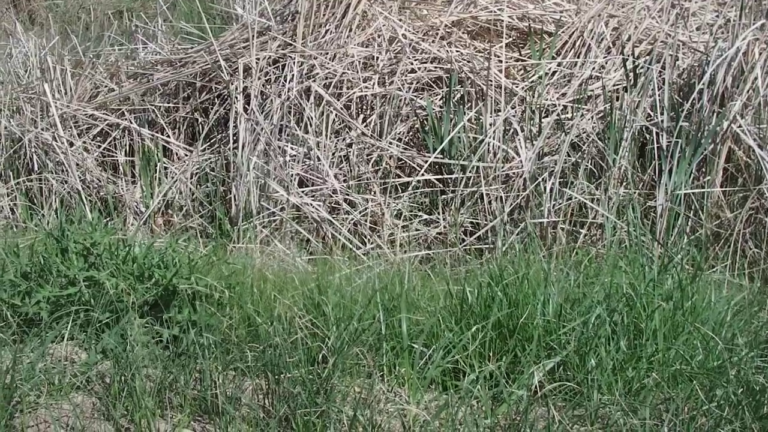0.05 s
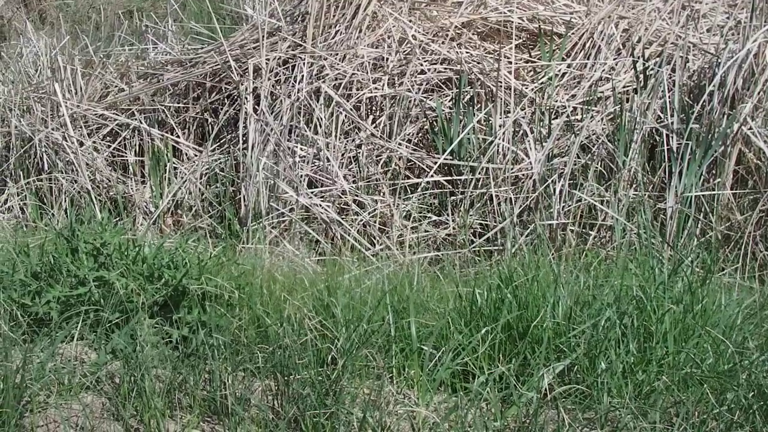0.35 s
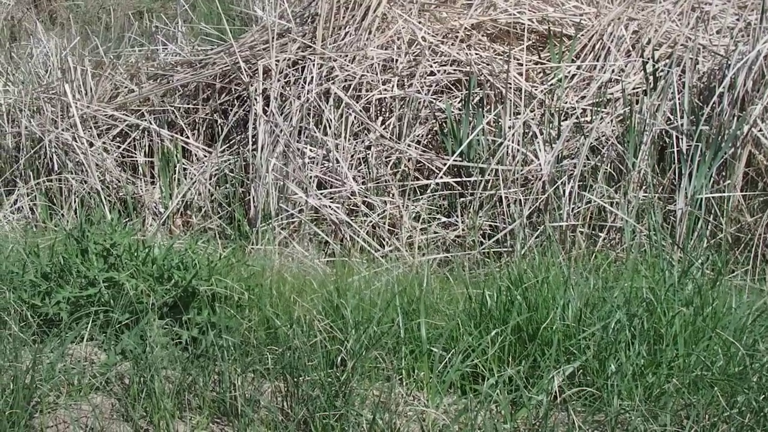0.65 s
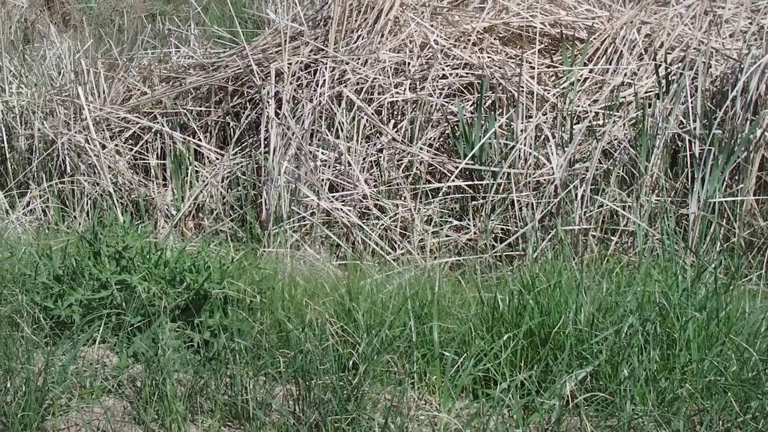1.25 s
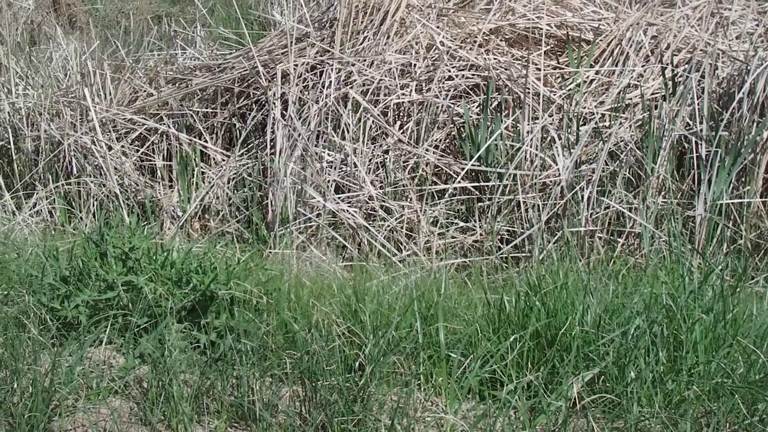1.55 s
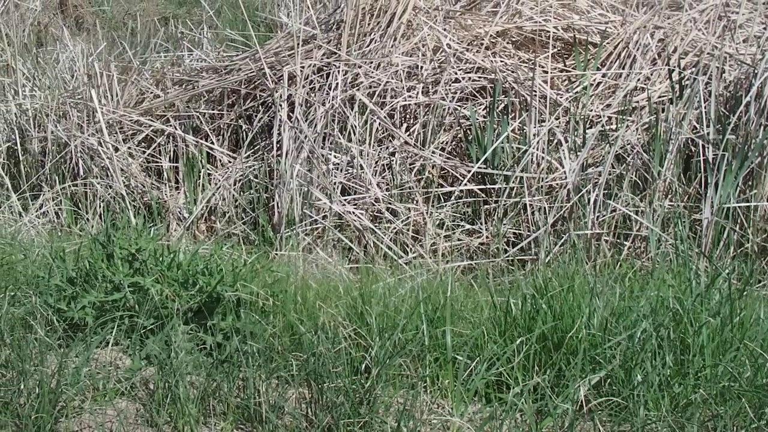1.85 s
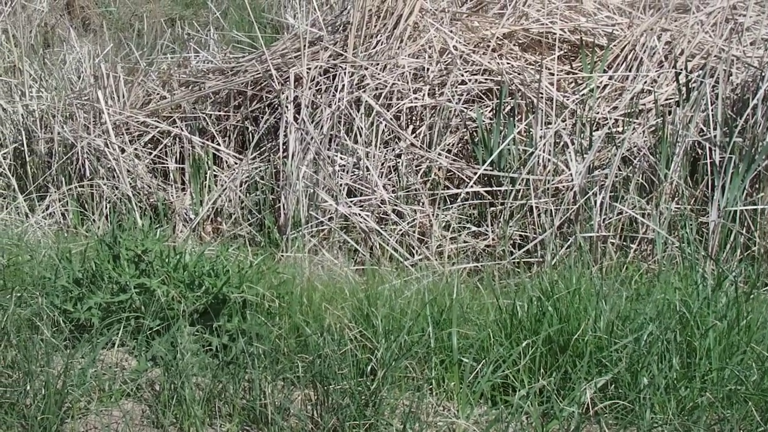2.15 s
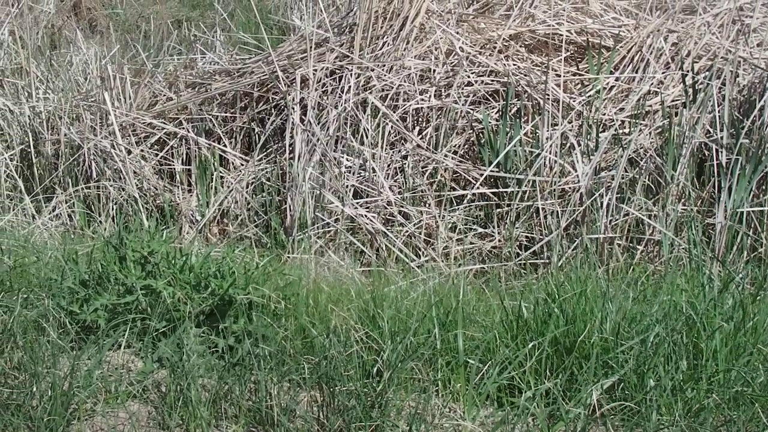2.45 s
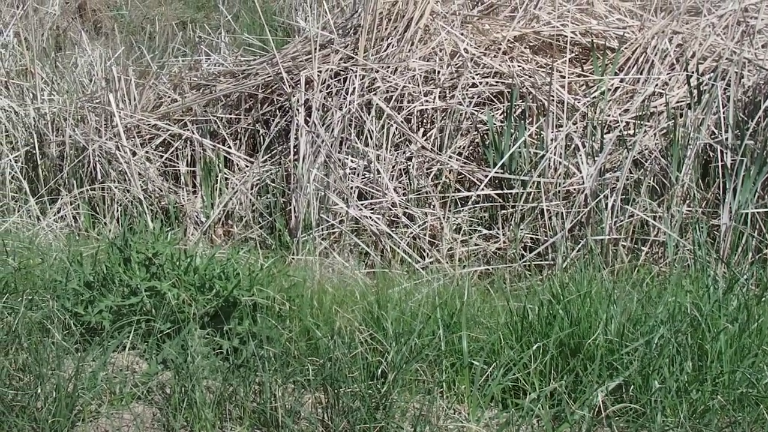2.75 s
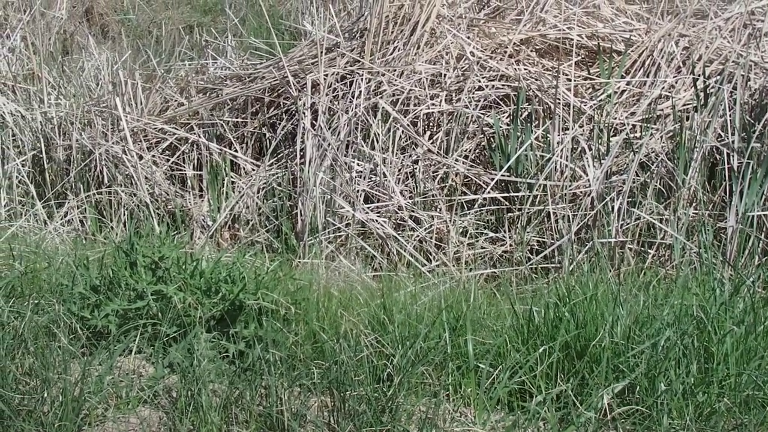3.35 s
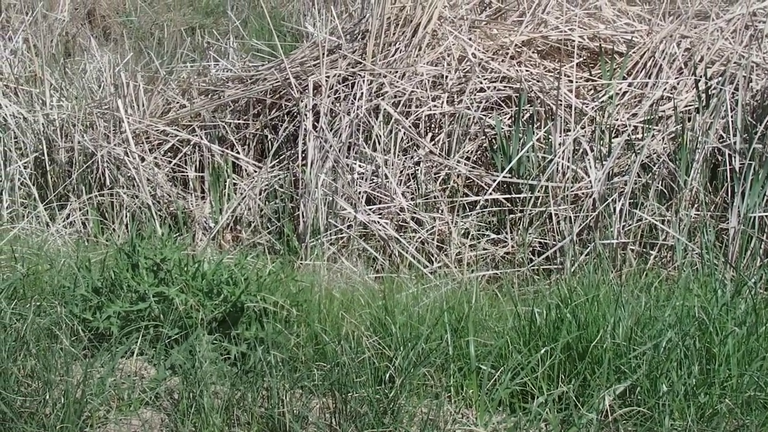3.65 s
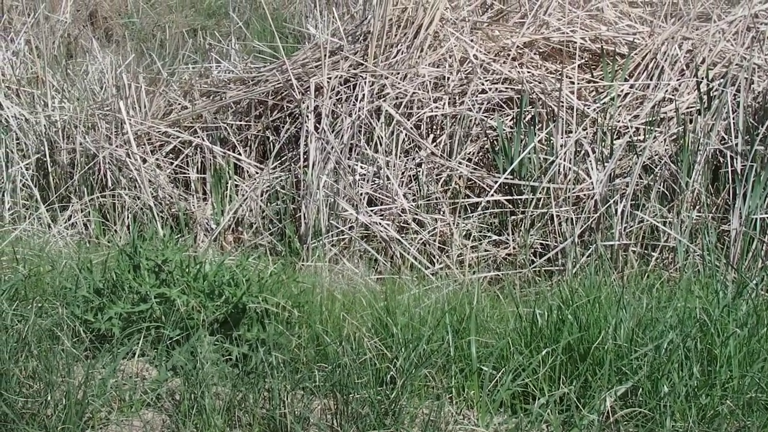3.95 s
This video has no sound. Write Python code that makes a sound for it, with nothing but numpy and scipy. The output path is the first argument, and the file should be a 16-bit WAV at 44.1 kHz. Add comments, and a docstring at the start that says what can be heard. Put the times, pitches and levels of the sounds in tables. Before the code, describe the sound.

A hidden marsh bird gives six harsh grunts, about three a second, from the start until 1.7 seconds, each rasp swelling into a short squeal. Loud, low wind rumbles and thumps on the microphone throughout, mostly on the left, hitting hardest at the start and around 1, 2.2 and 3.8 seconds, briefly dipping everything else. Reeds hiss softly and evenly beneath, while small birds whistle and chirp faintly far off.

```python
"""A reed marsh, hissing evenly, with small birds whistling far off. A hidden rail gives six harsh grunts:
uneven pulses and air ring its throat in a rasp that swells into a short squeal.
Wind buffets the microphone, mostly its left port; the hardest buffets overload it,
and the gain control ducks everything and creeps back."""
import sys
import numpy as np
from scipy import signal
from scipy.fft import rfft, irfft, next_fast_len
from scipy.io import wavfile
from scipy.ndimage import uniform_filter1d, map_coordinates

SR = 44100
rng = np.random.default_rng(int(sys.argv[2]) if len(sys.argv) > 2 else 0)


def materialize(psi):
    """Save the field psi as 16-bit PCM at rate SR to the path in sys.argv[1].

    A 1-D psi becomes a single channel; in a 2-D psi each row is a channel.
    """
    bounded = np.clip(np.atleast_2d(psi).T, -1, 1)
    quanta = np.round(bounded * 32767).astype(np.int16)
    wavfile.write(sys.argv[1], SR, quanta)


N = 176400


def amp(db):
    return 10 ** (np.asarray(db) / 20)


def unit(x):
    return x / np.sqrt(np.mean(x ** 2) + 1e-20)


def clock():
    return np.arange(N) / SR


def along(points, hz):
    """Read (Hz, value) points on a log frequency axis."""
    freqs, values = np.transpose(points)
    return np.interp(np.log(hz + 1), np.log(freqs + 1), values)


def fader(points):
    """A gain for each sample, from (seconds, dB) points."""
    return amp(np.interp(clock(), *np.transpose(points)))


def wobble(rate):
    """A smooth random curve, rate knots a second."""
    return map_coordinates(rng.standard_normal(8192), [clock() * rate], mode="wrap")


def filtered(x, response):
    """Shape x by a gain that depends on frequency."""
    size = next_fast_len(N + 8192)
    return irfft(rfft(x, size) * response(np.fft.rfftfreq(size, 1 / SR)), size)[..., :N]


def eq(x, curve):
    return filtered(x, lambda f: amp(along(curve, f)))


def noise(spectrum):
    """Coloured noise of rms 1."""
    return unit(eq(rng.standard_normal(N), spectrum))


def even(x, size):
    """Iron out swings of level slower than about size samples."""
    power = uniform_filter1d(uniform_filter1d(x * x, size), size)
    return x / np.sqrt(np.abs(power) + 1e-12)


def echo(x, t60_s):
    """A diffuse tail, different in each ear."""
    t = clock()[:SR]
    tail = rng.standard_normal((2, SR)) * amp(-60 * t / t60_s) * (1 - np.exp(-t / 0.012))
    return signal.fftconvolve(x[None], tail / np.linalg.norm(tail[0]), axes=1)[:, :N]


# Colour of the hiss. Each row: frequency in Hz, relative level in dB.
HISS_COLOUR = [(100, 14), (400, 7.5), (700, 3.5), (1400, -1.5), (2400, -3), (3400, -2), (4500, -8.5),
               (6500, -14), (8500, -19.5), (10000, -25), (14500, -22.5)]
# Stereo image of the hiss. Each row: frequency in Hz, left-right likeness (1 is mono).
HISS_LIKENESS = [(300, 0.31), (2500, 0.54), (5000, 0.29), (9000, .1)]


def marsh(hiss_db=-49, ticks_per_s=110):
    """The even, wide hiss of the reed bed, with faint ticks."""
    def spread(f):
        angle = np.arccos(along(HISS_LIKENESS, f)) / 2
        return np.array([np.cos(angle), np.sin(angle)])

    mid, side = filtered(np.array([noise(HISS_COLOUR), noise(HISS_COLOUR)]), spread)
    hits = rng.random((2, N)) < ticks_per_s / 2 / SR
    ticks = hits * amp(-32.5 - 17.5 * rng.random((2, N)))
    return amp(hiss_db + 0.5 * wobble(2.8)) * np.array([mid + side, mid - side]) + ticks


# Far whistles. Each row: start in seconds, length in seconds, first and last pitch in Hz, level in dB.
WHISTLES = [(0.075, .11, 2330, 2310, -55), (0.428, 0.042, 8340, 8600, -62),
            (0.809, 0.082, 2140, 2087, -53.5), (1.072, .13, 1094, 1062, -56),
            (1.11, .07, 8620, 8430, -66.5), (1.191, .14, 6810, 7750, -59),
            (1.468, 0.019, 6340, 5680, -58.5), (1.636, 0.02, 6100, 5300, -57),
            (1.7, 0.034, 4550, 4020, -59), (1.998, 0.038, 3950, 4200, -55),
            (2.157, 0.02, 4520, 4100, -55.5), (2.213, 0.018, 4166, 3800, -49.5),
            (2.251, .025, 4520, 4270, -52.5), (2.297, 0.17, 9320, 8440, -67.5),
            (2.37, 0.049, 3950, 3330, -55.5), (2.472, 0.088, 9000, 9000, -64),
            (2.81, 0.15, 8600, 7380, -65.5), (2.889, 0.035, 4860, 3720, -49.5),
            (2.883, 0.023, 3310, 2840, -49.5), (2.933, .15, 7350, 5460, -58),
            (3.059, 0.049, 4740, 5090, -58.5), (3.064, 0.061, 8680, 8630, -63.5),
            (3.17, 0.029, 9130, 8300, -58.5), (3.634, 0.022, 6470, 7050, -58),
            (3.778, .02, 6540, 7800, -54), (3.846, 0.01, 6200, 5050, -46), (3.944, .02, 6450, 5250, -53.5)]


def whistles(flicker_db=4):
    """Small birds whistle thin glides that waver and flicker."""
    t, out = clock(), np.zeros(N)
    waver = 1 + 0.009 * wobble(130)
    for start, length, from_hz, to_hz, db in WHISTLES:
        progress = np.clip((t - start) / length, 0, 1)
        pitch = (from_hz + (to_hz - from_hz) * progress) * waver
        fade = np.sqrt(4 * progress * (1 - progress))
        out += amp(db) * fade * np.sin(2 * np.pi * np.cumsum(pitch) / SR)
    return out * unit(amp(flicker_db * wobble(260)))


# Far rasping notes. Each row: centre in seconds, length in seconds, band centre in Hz, level in dB.
FAR_RASPS = [(1.827, 0.037, 2790, -47), (1.979, 0.065, 2970, -54), (2.759, 0.063, 3640, -56),
             (3.464, 0.066, 3270, -53.5), (3.896, 0.028, 2440, -52)]


def far_rasps(rattle_hz=59.4, log_width=0.2):
    """Soft bird rasps, each a rattling band of noise."""
    t, out = clock(), np.zeros(N)
    for centre, length, hz, db in FAR_RASPS:
        bell = lambda f: np.exp(-0.5 * (np.log((f + 1) / hz) / log_width) ** 2)
        band = filtered(rng.standard_normal(N), bell)
        fade = np.exp(-(2 * (t - centre) / length) ** 2)
        out += amp(db) * fade * unit(band * (1 + np.cos(2 * np.pi * rattle_hz * t)))
    return out


def far_birds():
    """The small birds, set back by a short scatter and the long echo of the marsh."""
    calls = whistles() + far_rasps()
    return amp(1) * calls + amp(-3.5) * echo(calls, t60_s=0.12) + amp(-4) * echo(calls, t60_s=1)


# Colours of the wind's flutter and of its faster eddies. Each row: frequency in Hz, relative level in dB.
FLUTTER_COLOUR = [(80, -6.5), (140, -3), (190, 2.5), (280, -8.5), (400, -22), (600, -38.5), (1000, -60.5),
                  (2000, -85)]
EDDY_COLOUR = [(150, -23), (300, 11.5), (450, 2.5), (700, -18), (1200, -48.5), (2500, -61)]


def puffs(rows, width_s=0.012, eddy_growth=2.045):
    """Short swells of flutter; the stronger ones shed faster eddies."""
    t = clock()
    force = amp(-1.5) * sum(amp(db) * np.exp(-((t - centre) / width_s) ** 2) for centre, db in rows)
    flutter = force * even(noise(FLUTTER_COLOUR), size=500)
    eddies = amp(-7.5 + 3 * wobble(120)) * force ** eddy_growth * noise(EDDY_COLOUR)
    return flutter + eddies


# Soft thumps of wind. Each row: centre in seconds, level in dB.
THUMPS = [(.383, -6.5), (0.413, -5), (0.453, -1.5), (0.517, 0), (0.575, 0), (0.756, 1.5), (.927, 0.5),
          (1.112, -1), (1.273, 1.5), (1.765, 0), (1.882, 2), (1.989, 2.5), (2.179, -3), (2.505, -0.5),
          (2.798, -1), (2.824, -2.5), (3.257, -11), (3.771, 3), (3.83, 5.5), (3.948, 2.5)]


def thumps(hz=87, width_s=0.0063, edge_s=0.0012):
    """Small eddies at the port: the pressure swings up and drops back."""
    out = np.zeros(N)
    for centre, db in THUMPS:
        u = clock() - centre
        out -= amp(db) * np.tanh(u / edge_s) * np.exp(-(u / width_s) ** 2) * np.cos(2 * np.pi * hz * u)
    return out


# Colour of the wind's rumble. Each row: frequency in Hz, relative level in dB.
RUMBLE_COLOUR = [(15, -18), (30, -23), (60, 1.5), (120, 1.5), (170, -8.5), (260, -35.5), (500, -58.5),
                 (1000, -79.5)]
# Fader rides of the gusts at each port. Each row: time in seconds, relative level in dB.
LEFT_GUSTS = [(0.0, -4.5), (0.04, -2.5), (0.17, -8.5), (0.6, -8), (0.63, -14.5), (0.83, -11.5),
              (0.88, -17.5), (1.11, -2), (1.19, -17), (1.28, -7.5), (1.59, -17), (1.79, -9.5),
              (1.82, -14.5), (2.08, -6.5), (2.12, -25.5), (2.24, -5.5), (2.46, -24), (2.5, -16),
              (2.56, -17.5), (2.74, -14.5), (2.95, -6.5), (3.15, -21), (3.27, -9.5), (3.41, -19.5),
              (3.53, -12.5), (3.68, -16), (3.76, -9), (4.0, -7)]
RIGHT_GUSTS = [(0.0, -17.5), (0.19, -29), (0.28, -22), (0.61, -18), (0.66, -32), (0.85, -21), (0.96, -27),
               (1.06, -9.5), (1.22, -28.5), (1.55, -14.5), (1.68, -31), (1.82, -25), (1.96, -22),
               (2.09, -29), (2.22, -20.5), (2.54, -32.5), (2.7, -19), (2.93, -34.5), (3.03, -28),
               (3.16, -39), (3.57, -10.5), (3.65, -26.5), (3.8, -7.5), (4.0, -19.5)]
# Puffs of turbulence at each port. Each row: centre in seconds, relative level in dB.
LEFT_PUFFS = [(0.066, -2), (.03, -2.5), (0.248, -7), (0.276, -8), (0.306, -16), (0.33, -6.5), (0.384, 0.5),
              (0.41, -4), (0.448, -0.5), (0.516, -5.5), (0.574, -4), (0.618, -7.5), (0.7, -16.5),
              (0.778, -7), (0.812, -8.5), (0.926, -9.5), (1.122, -3), (1.164, -14.5), (1.23, -14),
              (1.268, -9.5), (1.336, -5.5), (1.378, -11.5), (1.406, -20.5), (1.434, -12.5), (1.462, -18),
              (1.512, -16.5), (1.574, -18.5), (1.856, -10), (1.882, -12), (1.932, -6), (1.99, -12),
              (2.21, -7), (2.098, -17.5), (2.15, -10), (2.176, -11), (2.356, -14), (2.508, -18.5),
              (2.54, -14.5), (2.792, -18.5), (2.826, -11), (2.904, -10.5), (3.056, -22.5), (3.238, -18),
              (3.26, -15), (3.654, -15.5), (3.722, -6), (3.772, 2), (3.83, -3.5), (3.888, -4), (3.948, -7),
              (3.99, -3.5)]
RIGHT_PUFFS = [(3.724, -21.5), (3.811, 1), (3.829, -13.5)]


def wind():
    """Unrelated turbulence at the two ports: rumble, light flutter and puffs, with thumps on the left."""
    def port(gusts, flutter_db):
        rumble = even(noise(RUMBLE_COLOUR), size=1500)
        flutter = amp(flutter_db + 5.8 * wobble(45)) * noise(FLUTTER_COLOUR)
        return fader(gusts) * (rumble + flutter)

    left = amp(-3) * port(LEFT_GUSTS, flutter_db=-18.5) + puffs(LEFT_PUFFS) + thumps()
    right = amp(-1.5) * port(RIGHT_GUSTS, flutter_db=-17) + puffs(RIGHT_PUFFS)
    return np.array([left, right])


# Hard hits of wind. Each row: centre in seconds, push level in dB, snap level in dB.
BUFFETS = [(.023, 8.5, -1.5), (1.052, 6, -10.5), (1.725, 0.5, -16), (1.784, 3, -11), (2.205, 1, -16.5),
           (2.231, 7.5, -9), (2.937, 1.5, -14.5), (3.746, 6.5, 1)]


def buffets(push_hz=134, push_s=0.0034, snap_s=0.00043, right_db=-28.5):
    """An eddy strikes the left port: a low push with a sharp snap of pressure in it."""
    out = np.zeros(N)
    for centre, push_db, snap_db in BUFFETS:
        u = clock() - centre
        out += amp(push_db) * np.exp(-(u / push_s) ** 2) * np.sin(2 * np.pi * push_hz * u)
        out += amp(snap_db) * np.e * u / snap_s * np.exp(-np.abs(u) / snap_s)
    return np.array([out, amp(right_db) * out])


# Overall EQ of the rail's voice. Each row: frequency in Hz, gain in dB.
VOICE_EQ = [(200, -31), (500, 1.5), (1000, -3), (3900, 6), (4200, -1.5), (6300, -5), (7200, -8), (8900, -8),
            (9500, -41.5)]


def voice(pulse_hz, throat, jitter, scatter_db=3, air_share=0.65):
    """Uneven pulses and puffs of air ringing the throat, at a steady level."""
    def resonances(f):
        return sum((-1) ** i * amp(db) * 1j * f * width / (hz * hz - f * f + 1j * f * width)
                   for i, (hz, width, db) in enumerate(sorted(throat)))

    cycles = np.cumsum(pulse_hz * np.ones(N)) / SR
    beats = np.arange(4000) + jitter * rng.standard_normal(4000)
    onsets = np.round(np.interp(beats, cycles, np.arange(N), right=N)).astype(int)
    sizes = amp(scatter_db * rng.standard_normal(len(beats)))
    pulses = np.bincount(onsets, sizes, N + 1)[:N]
    # Each pulse trails a brief breath of noise.
    air = signal.lfilter([1], [1, -np.exp(-1 / (0.0013 * SR))], pulses) * rng.standard_normal(N)
    source = unit(pulses) + air_share * unit(air)
    return even(filtered(source, lambda f: resonances(f) * amp(along(VOICE_EQ, f))), size=900)


# Throat resonances of the rasp. Each row: centre in Hz, width in Hz, gain in dB.
RASP_THROAT = [(647, 260, -3), (1172, 130, 1), (2290, 490, -3), (2530, 150, 4), (2975, 430, 5),
               (3544, 430, 0.5), (3606, 100, 1.5), (4640, 180, -2.5), (5200, 160, -6), (5920, 320, -10.5)]


def rasp(squeal_times, crest_hz=639.4, sag=0.2, lead_s=0.025, arch_s=0.12):
    """A rattling voice whose wavering pitch arches up to a crest just before each squeal."""
    arch = np.max([np.exp(-((clock() - at + lead_s) / arch_s) ** 2) for at in squeal_times], axis=0)
    pitch = crest_hz * (1 - sag * (1 - arch)) * (1 + 0.04 * wobble(220))
    return voice(pitch, RASP_THROAT, jitter=0.045) * unit(amp(wobble(210)))


# Harmonics of the tone in the squeal. Each row: harmonic number, relative level in dB.
TONE_PARTIALS = [(1, -19.5), (2, -18), (3, 8), (4, -18.5), (5, -24), (6, -23)]


def squeal_tone(u, throat_hz, fall_hz, waver, rise_s=0.035, drop_s=0.0038):
    """A tone whose third harmonic climbs to the throat resonance and drops as the time u passes zero."""
    climb = 1 - 0.052 * np.clip(-u / rise_s, 0, 1) ** 2
    drop = (1 + np.tanh(u / drop_s)) / 2
    pitch = throat_hz / 3 * climb - fall_hz * drop
    phase = 2 * np.pi * np.cumsum(pitch * waver) / SR
    return sum(amp(db) * np.sin(harmonic * phase) for harmonic, db in TONE_PARTIALS)


# Lesser throat resonances of the squeal. Each row: centre in Hz, width in Hz, gain in dB.
SQUEAL_THROAT = [(1170, 180, -31.5), (2220, 400, -16), (3930, 250, -10), (4700, 500, -26), (5800, 500, -38),
                 (6260, 330, -28.5), (8700, 900, -37)]
# The grunts. Each row: start and squeal centre in seconds, rasp and squeal levels in dB, squeal length
# in seconds, main throat resonance in Hz, tone level in dB, fall of the tone's fundamental in Hz.
GRUNTS = [(-.1, 0.01, -32, -34.5, 0.027, 3255, -41, 0.5), (0.24, 0.351, -33, -27.5, 0.04, 3274, -33.5, 24),
          (0.547, 0.691, -34, -27.5, 0.032, 3266, -29.5, 20),
          (0.875, 1.019, -33.5, -34.5, 0.012, 3146, -34, 93.5),
          (1.19, 1.314, -35, -36, 0.026, 3124, -42, 27.5),
          (1.472, 1.615, -33.5, -31.5, 0.016, 3234, -31, 89)]


def grunts(attack_s=0.034, swell_db_per_s=81.5, release_s=0.016, squeal_in_s=0.0086, squeal_out_s=0.0045):
    """Each grunt: a swelling rasp, then a squeal with a rough tone in it."""
    t, out = clock(), np.zeros(N)
    rasping = rasp([peak for _, peak, *_ in GRUNTS])
    waver = 1 + 0.0182 * wobble(400)
    roughness = unit(amp(5 * wobble(450)))
    for start, peak, rasp_db, squeal_db, length, throat_hz, tone_db, fall_hz in GRUNTS:
        u = t - peak
        attack = np.clip((t - start) / attack_s, 0, 1)
        swell = amp(swell_db_per_s * np.minimum(u, 0))
        release = np.exp(-(np.maximum(u, 0) / release_s) ** 2)
        out += amp(rasp_db) * attack * swell * release * rasping
        fade_in = np.exp(np.minimum(u + length / 2, 0) / squeal_in_s)
        fade_out = np.exp(-np.maximum(u - length / 2, 0) / squeal_out_s)
        squeal = voice(pulse_hz=267.5, throat=SQUEAL_THROAT + [(throat_hz, 420, 0)], jitter=0.085)
        tone = roughness * squeal_tone(u, throat_hz, fall_hz, waver)
        out += fade_in * fade_out * (amp(squeal_db) * squeal + amp(tone_db) * tone)
    return out


# EQ on the rail's long echo. Each row: frequency in Hz, gain in dB.
ECHO_EQ = [(2000, 1), (2620, -2.5), (2780, 8.5), (2940, -8.5), (3300, -5), (3800, -5.5), (8000, 5)]


def rail():
    """The rail grunts from cover: a tight mono scatter off the reeds, then a wide, ringing tail."""
    call = grunts()
    reeds = echo(call, t60_s=0.07)[0]
    tail = eq(echo(call, t60_s=1), ECHO_EQ)
    return call + amp(-6) * reeds + amp(-18.5) * tail


def scene():
    return rail() + far_birds() + wind() + buffets() + marsh()


def record(dry, limit_db=-0.5, recover_db_per_s=11.0, attack_s=0.006, top_hz=15500):
    """The gain drops on an overload and recovers slowly; what gets through is clipped and low-passed."""
    needed_db = np.minimum(limit_db - 20 * np.log10(np.abs(dry).max(0) + 1e-9), 0)
    recovery_db = recover_db_per_s * clock()
    gain_db = np.minimum.accumulate(needed_db - recovery_db) + recovery_db
    gain = amp(uniform_filter1d(gain_db, int(attack_s * SR)))
    return filtered(np.clip(dry * gain, -1, 1), lambda f: f < top_hz)


dry = scene()
out = record(dry)
materialize(out)
```